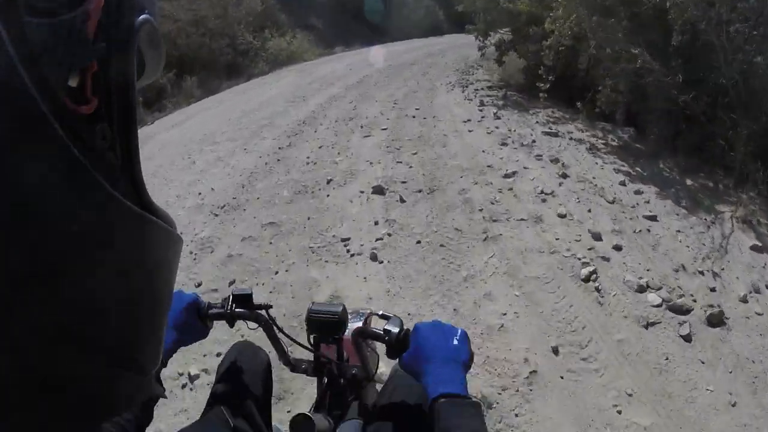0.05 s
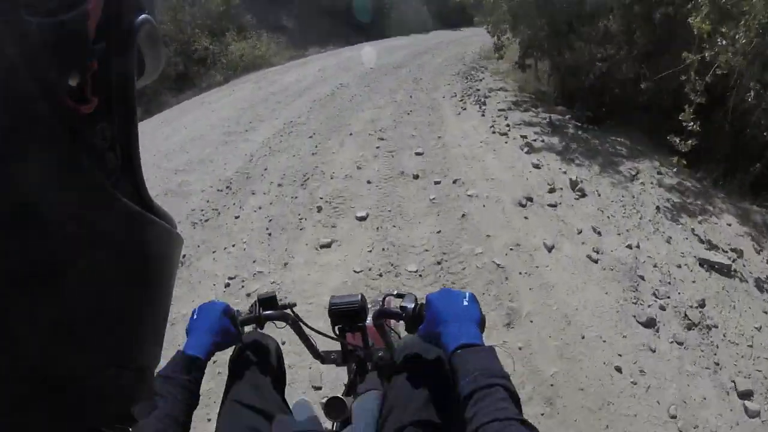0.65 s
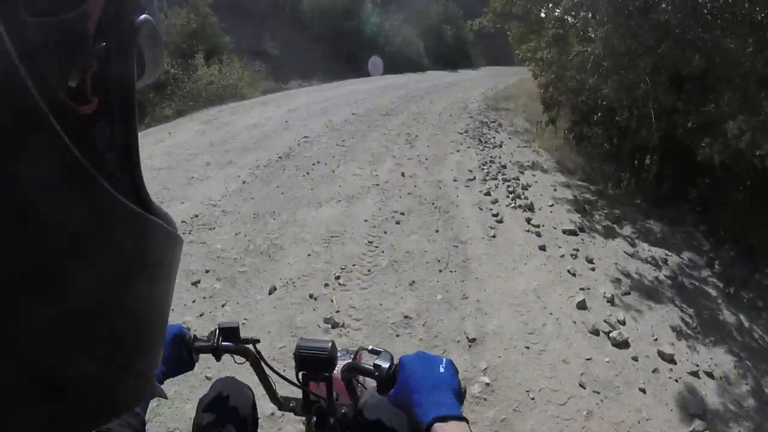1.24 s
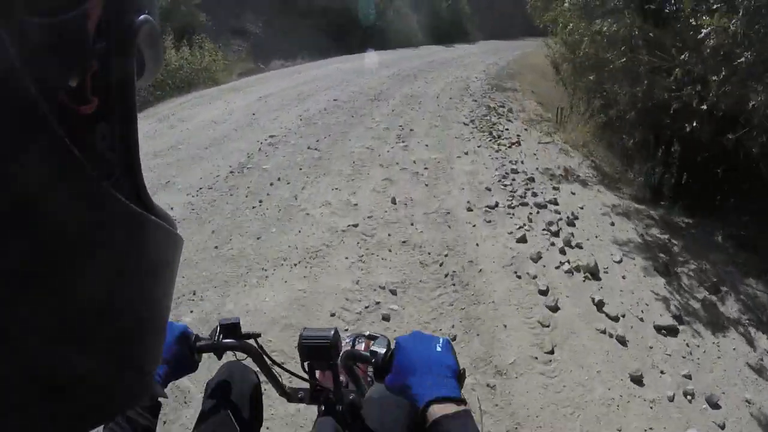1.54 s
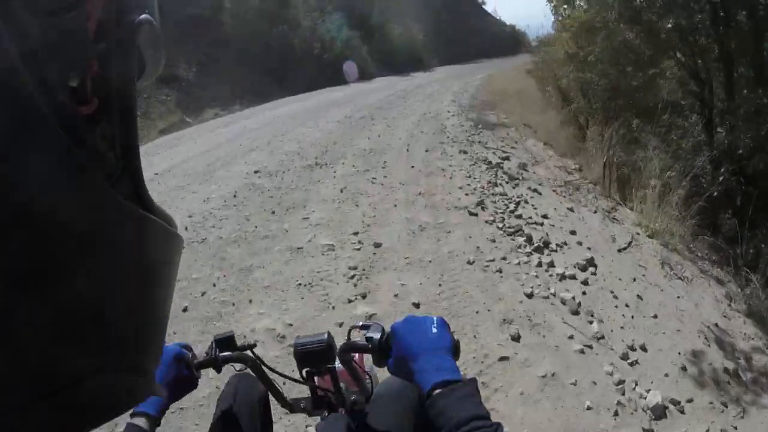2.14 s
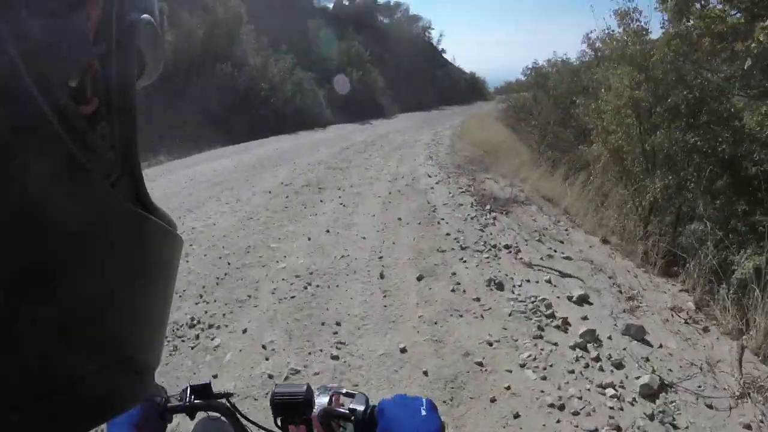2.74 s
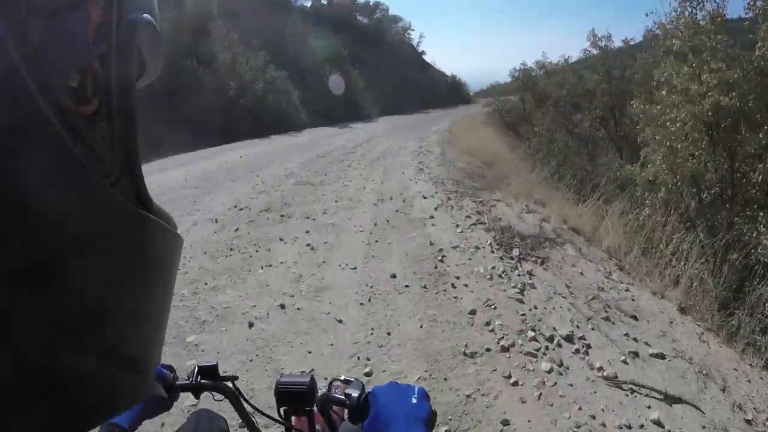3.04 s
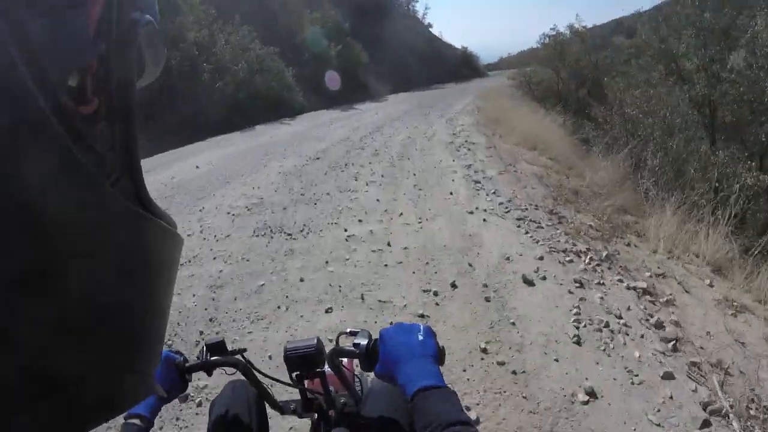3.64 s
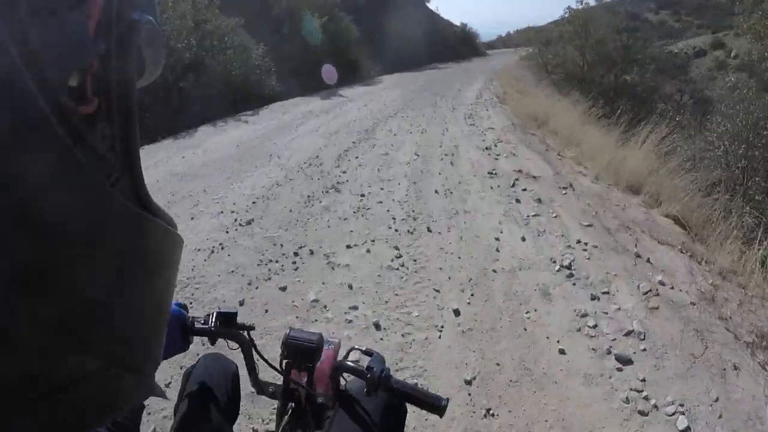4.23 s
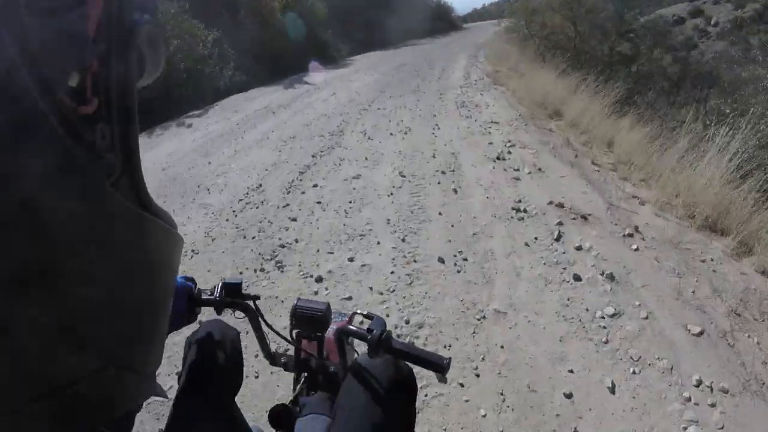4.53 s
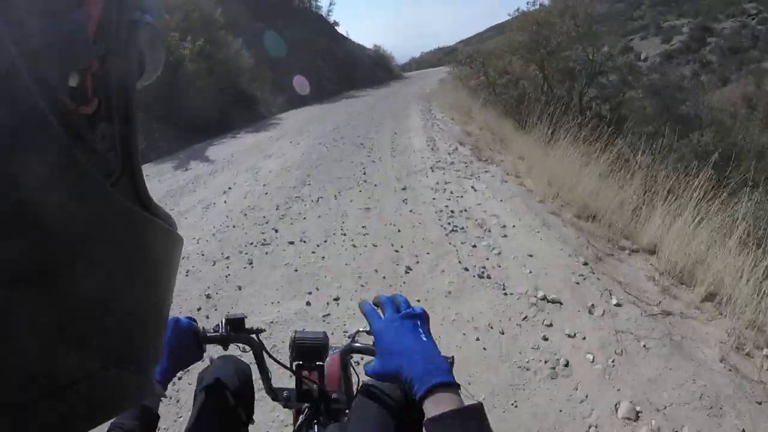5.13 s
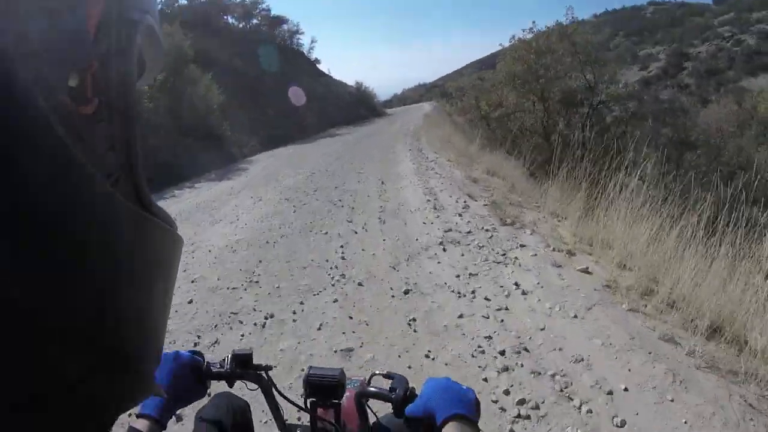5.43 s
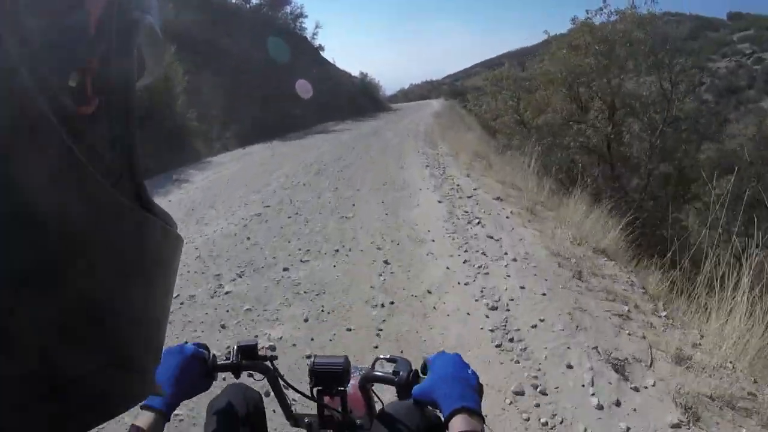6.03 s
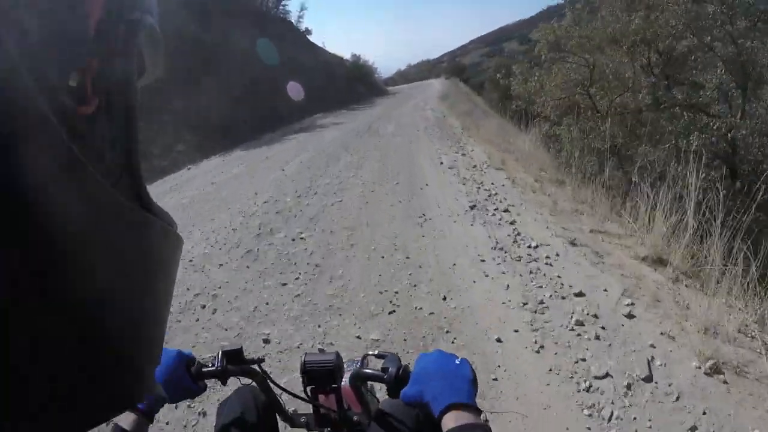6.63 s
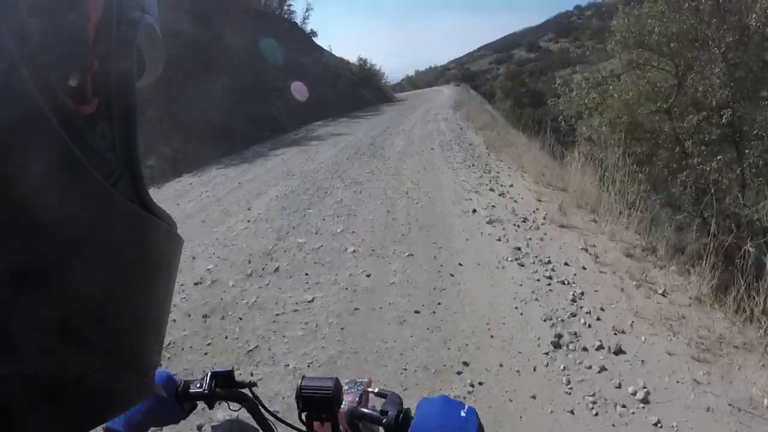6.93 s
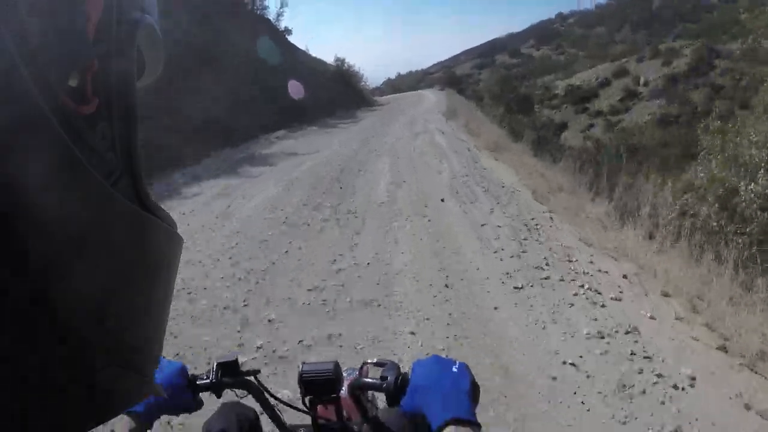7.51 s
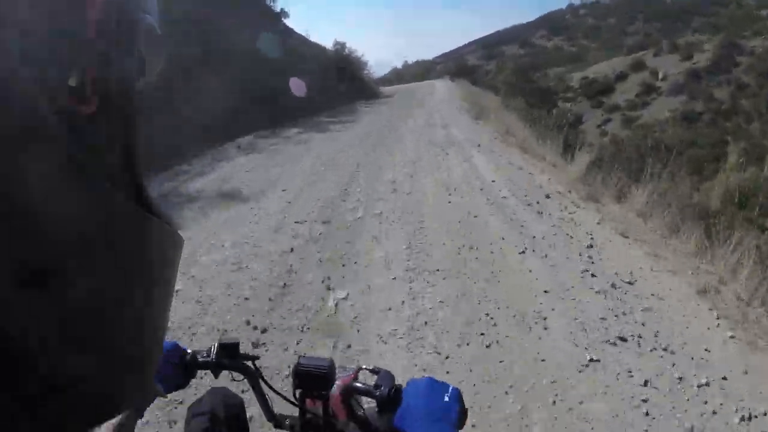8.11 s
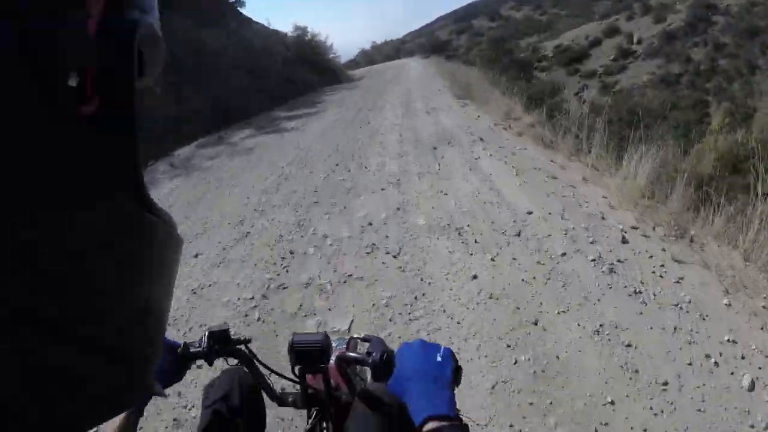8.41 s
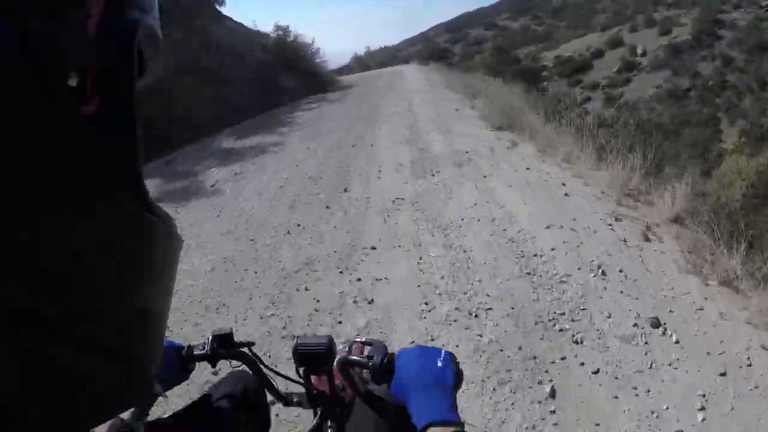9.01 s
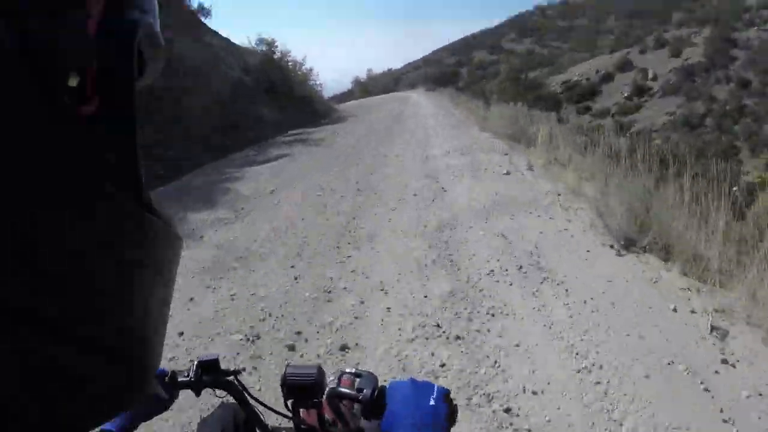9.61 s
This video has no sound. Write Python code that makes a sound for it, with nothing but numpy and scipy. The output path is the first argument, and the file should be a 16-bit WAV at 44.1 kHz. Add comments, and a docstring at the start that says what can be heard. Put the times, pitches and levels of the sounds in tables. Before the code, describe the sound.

Heard close from the rider's helmet in open air, tyres crunch over loose gravel as a minibike rolls without its engine. It opens with a short wavering brake hum, a sharp stone strike and deep thumps. Irregular knocks and metal clanks follow, with a buzzing frame, hissing sand and low air rumble. After a smoother stretch, the jolts and clatter return.

```python
"""A minibike jolts down a gravel road, engine off, heard from the rider's helmet.
Bumps rock the camera with a deep thump, a loose part knocks on its stop, steel parts clank.
The tyres roar, crunch and fling stones; the frame buzzes and sand hisses on thin steel.
Air and road rumble underneath. At first a dragging brake hums."""
import sys
import numpy as np
from scipy import signal
from scipy.fft import rfft, irfft, next_fast_len
from scipy.io import wavfile
from scipy.ndimage import map_coordinates

SR = 44100
rng = np.random.default_rng(int(sys.argv[2]) if len(sys.argv) > 2 else 0)


def put_to_file(sound):
    """Save the sound as 16-bit audio at rate SR, in the file named by the first command-line argument."""
    columns = np.atleast_2d(sound).T  # one column per channel
    safe = np.clip(columns, -1, 1)
    whole_steps = np.round(safe * 32767)
    wavfile.write(sys.argv[1], SR, whole_steps.astype(np.int16))


N = 430416
TIME_S = np.arange(N) / SR
HIT_S = np.arange(SR // 3) / SR  # time within one hit

# Timelines; levels are relative within each column.
# road shaking the bike: time_s, level_db
ROAD_SHAKE = [(0.0, -40.5), (0.35, -52.5), (0.58, -41.5), (0.89, -45.5), (1.68, -43), (1.96, -52),
              (2.2, -47), (2.88, -47), (3.04, -54), (3.23, -56.5), (3.97, -51.5), (4.27, -42.5),
              (5.06, -48.5), (5.43, -47), (5.63, -53.5), (6.03, -62), (6.5, -55.5), (6.68, -48.5),
              (6.95, -57), (7.26, -61), (7.75, -54), (7.88, -47.5), (8.78, -49), (9.05, -43.5),
              (9.76, -47.5)]
# air and road rumble: time_s, level_db
RUMBLE_CURVE = [(0.0, -44.5), (0.46, -51), (1.14, -37.5), (2.28, -48.5), (2.77, -44), (3.2, -47),
                (3.5, -57), (3.72, -52), (4.0, -54), (4.35, -47), (5.5, -44), (5.73, -57), (6.2, -58.5),
                (6.75, -51.5), (7.2, -61), (7.5, -55.5), (7.72, -56), (7.95, -44), (8.4, -44.5),
                (8.87, -46.5), (9.16, -37.5), (9.76, -43.5)]
# brake pad drags: peak_s, swell_s, level_db
BRAKE_RUBS = [(0.005, 0.12, -46), (0.495, 0.89, -37), (1.0, 0.61, -48), (1.23, 0.47, -50.5),
              (1.38, 0.16, -51), (1.75, 0.76, -51.5), (1.92, .3, -54), (2.15, .4, -54.5)]
# pebbles hit the mudguard: start_s, level_db
PEBBLE_HITS = [(0.130, -42), (0.986, -49), (2.109, -49), (2.197, -52), (2.225, -49), (2.333, -47.5),
               (2.413, -56), (3.146, -65), (3.595, -52), (3.875, -55), (4.926, -48), (5.683, -54),
               (5.722, -56.5), (5.797, -58), (6.037, -61), (6.151, -56), (6.180, -56), (6.222, -51.5),
               (6.251, -58), (6.272, -61), (6.281, -60), (6.319, -60), (6.347, -58), (6.407, -53.5),
               (6.425, -51), (6.440, -53), (6.627, -50), (6.814, -55), (7.032, -57), (7.267, -54),
               (7.462, -54), (7.688, -57), (9.041, -48), (9.084, -49)]
# small steel fitting lands: start_s, level_db
FITTING_HITS = [(0.801, -54), (0.945, -55), (1.055, -55), (1.076, -49), (1.128, -58), (1.292, -59),
                (1.312, -58), (1.522, -53), (1.550, -59), (1.577, -55), (2.402, -64), (2.858, -54),
                (2.880, -58), (4.385, -55), (4.783, -58), (4.888, -53), (9.072, -53)]
# tyre squeezes out a heap of stones: start_s, level_db
STONE_HEAPS = [(0.896, -28.5), (1.945, -39.5), (2.107, -36.5), (2.254, -37.5), (2.304, -36), (2.334, -38.5),
               (2.417, -59), (3.046, -40), (3.257, -39), (3.405, -39.5), (3.545, -50), (5.964, -56),
               (7.114, -42), (7.935, -36.5), (8.057, -36), (8.171, -39), (8.804, -41.5), (8.9227, -32)]
# stones hit the frame: start_s, level_db
STONE_HITS = [(0.801, -32), (0.9071, -1.5), (1.0758, -22), (1.181, -33), (9.022, -24), (9.301, -27)]
# chassis bottoms out: start_s, level_db
CHASSIS_HITS = [(1.585, -13)]
# steel parts clash: start_s, level_db, splinter_db, bracket_db
STEEL_HITS = [(0.3185, -39.5, -76, -60), (0.5817, -37.5, -57, -58), (0.6845, -29, -59, -39),
              (0.8557, -36.5, -57, -54), (1.0966, -37, -58, -53), (1.3414, -39, -56.5, -51),
              (1.4735, -35, -69, -52), (1.51, -38.5, -76, -55), (1.6170, -36, -59, -50),
              (2.1618, -41, -73, -56), (2.6497, -44.5, -61.5, -54), (2.701, -43, -76, -62),
              (2.7981, -32, -64, -50), (2.91, -35, -57, -55), (4.09, -43, -60, -56),
              (4.2374, -26, -54, -36), (4.2621, -21.5, -46, -24.5), (4.4148, -38.5, -69, -58),
              (4.5918, -30, -57, -55), (4.6457, -41, -74, -58), (5.121, -43.5, -66, -59),
              (5.1782, -33.5, -61, -48), (6.559, -28, -57, -51), (6.6674, -43, -78, -60),
              (6.7415, -46.5, -80, -66), (7.8694, -40, -63, -55), (8.821, -39.5, -61, -60),
              (8.9519, -28.5, -59, -37), (9.423, -41.5, -78, -52), (9.6759, -39, -67, -44)]
# loose part hits its stop: start_s, clack_db, pitch_hz, hollow_db
PART_HITS = [(0.6689, -29.5, 1820, -47), (1.475, -31.5, 1810, -45), (1.7265, -37, 1980, -38),
             (2.0632, -38, 1850, -41.5), (2.2274, -42, 1960, -44), (2.381, -45, 1820.0, -55),
             (2.609, -39.5, 1750.0, -56), (2.6609, -44, 1870, -42.5), (2.7791, -38.5, 1670, -57),
             (2.805, -27.5, 1803, -36.5), (2.9477, -42, 1770, -39), (3.0111, -34.0, 1745, -46),
             (3.072, -47, 1850, -42), (3.2, -64, 1830, -44), (3.222, -51, 1880, -40.5),
             (3.3992, -37, 1790, -45), (3.5528, -50, 1900, -42.5), (3.627, -49, 1830, -42.5),
             (3.7189, -30.5, 1900, -41), (3.834, -48, 1830, -42.5), (4.0178, -34, 1820, -38),
             (4.1385, -30.5, 1860, -34.5), (4.2253, -25, 1914, -34.5), (4.3385, -30.5, 1870, -39),
             (4.37, -18.5, 1810, -28), (4.5216, -31.0, 1834, -38), (4.7067, -22, 1825, -49),
             (4.814, -19.5, 1838, -27), (4.9656, -26.5, 1857, -35), (5.1582, -26, 1720, -33),
             (5.2909, -30, 1870, -33), (5.4375, -31.5, 1855, -35.5), (5.4989, -40, 1830, -45),
             (5.5732, -26.0, 1810, -35), (5.7838, -46.0, 1820, -57), (5.934, -55, 1870, -44.5),
             (6.3056, -52, 1700, -43.5), (6.536, -48, 1780, -51), (6.582, -44, 1780, -38.5),
             (6.758, -38, 1890, -43.5), (6.9217, -36.5, 1930, -45.5), (7.0713, -42.5, 1675, -40),
             (7.4066, -40.5, 1890, -44), (7.7263, -33, 1890, -35), (7.8181, -36, 1883, -44),
             (7.9084, -30.5, 1796, -35), (8.0641, -40, 1840, -46), (8.163, -43, 1850, -44),
             (8.2771, -33, 1787, -35), (8.3724, -43, 1930, -37.5), (8.4427, -45, 1970, -40),
             (8.5974, -42, 1787, -37.5), (8.7061, -29, 1790, -37.5), (8.8438, -32.5, 1757, -52),
             (8.9625, -24, 1817, -33.5), (9.0094, -26, 1865, -35.5), (9.0563, -19.5, 1785, -37),
             (9.2135, -29, 1850, -34), (9.3487, -24, 1820, -38), (9.4509, -30.0, 1822, -33),
             (9.5487, -21.5, 1853, -41)]
# road bumps, sharp edges thump: start_s, sway_db, thump_db
ROAD_BUMPS = [(0.071, -21.5, -70), (0.205, -23.5, -68), (0.67, -18.5, -35), (0.906, -2, -16),
              (0.996, -13, -57), (1.132, -4.5, -27.5), (1.377, -7, -33), (1.482, -2, -19),
              (1.751, -17.5, -69), (2.021, -18, -38), (2.476, -13.5, -55), (2.579, -12.5, -48),
              (2.812, -6, -26), (4.183, -21, -39), (4.337, -9.5, -33), (4.472, -12.5, -31.5),
              (4.675, -15.5, -34.5), (4.786, -13, -25), (4.931, -17.5, -51), (5.127, -12, -37.5),
              (5.391, -22, -38), (5.519, -24, -56), (6.674, -28, -58), (7.914, -22, -34),
              (8.372, -16.5, -37), (8.698, -25.5, -53), (9.013, -8, -22.5), (9.315, -17, -70),
              (9.415, -11.5, -30), (9.511, -13, -29)]

# modes of struck bodies: pitch_hz, level_db, t60_s
MUDGUARD_MODES = [(3260, 0, .034), (3640, -2, .026), (5400, -17, .015), (6500, -13, .016),
                  (7250, -14, .016), (8500, -8.5, .024)]
FITTING_MODES = [(4740, 3, 0.023), (5200, -2, 0.073)]
STONE_MODES = [(540, -11, 0.01), (995, -19, 0.011), (1520, -3.5, 0.015), (1790, -2.5, 0.014),
               (2130, -0.5, 0.014), (2930, -2.5, 0.032), (3485, -5.5, 0.0056), (5060, -17, 0.0064),
               (6500, -34, .005), (7930, -29, .006)]
CHASSIS_MODES = [(212.5, -0.5, 0.21), (326, -7.5, 0.11), (446, 1, 0.0085), (610, -7, 0.042),
                 (680, -2, 0.055), (984, -6.5, 0.031), (1380, -0.5, 0.0065)]
STEEL_MODES = [(2100, -10, .08), (2995, -13, .07), (3305, 0, .14), (3480, -6, .07), (3658, -3, .1),
               (6120, -19, .05), (8550, -17, .05)]
TUBE_MODES = [(681, -11, 0.1), (1248, -10, 0.16), (1351, -5.5, 0.14), (1408, -7.5, 0.2), (1897, -8.5, 0.15)]
BRACKET_MODES = [(4240, 0, .11), (4390, -9, .07), (4546, -13, .06)]
PART_MODES = [(404, -19, 0.063), (973, -14, 0.034), (1308, -9, 0.023), (1696, 0, 0.0048),
              (1840, 1.5, 0.023), (2120, -20.5, 0.15), (2360, -5.5, 0.012), (2760, -6.5, 0.0037),
              (3080, -14.5, 0.024), (4900, -28.5, 0.0093)]
HOLLOW_MODES = [(715.6, 0, 0.063), (655, -8.5, 0.0093), (1374, -8.5, 0.043)]

# resonances of thin steel and frame: centre_hz, width_hz, gain_db
SHEET_PEAKS = [(3215, 190, 10), (3630, 240, -10), (5600, 210, -22), (6170, 100, 0.5), (7100, 69, -6),
               (8140, 67, -44)]
FRAME_PEAKS = [(708, 51, 7), (1363, 42, 10), (1386, 133, 2.5), (1938, 44, 9), (2080, 15, 10.5),
               (2377, 14, 6.5), (3420, 45, -19), (3634, 82, 8), (4326, 36, 3)]

# spectra of rolling and contact noise: freq_hz, density_db
RUMBLE_SPECTRUM = [(12, -4), (24, -2.5), (35, 2), (44, -23.5), (55, -17), (85, -43), (200, -40.5),
                   (400, -108)]
FIZZ_SPECTRUM = [(3000, -20.5), (4700, 8), (6500, 2.5), (8500, 3), (9800, -10.5), (12500, -0.5), (15000, 2)]
GRIT_SPECTRUM = [(1500, -20), (2700, -6), (3300, 8), (3700, 6), (4600, -12), (6300, -6), (7200, -12),
                 (8500, -7), (9800, -25), (15000, -42)]
TYRE_SPECTRUM = [(40, -29), (75, -6.5), (110, 3.5), (160, -1), (220, 0), (380, 1.5), (500, -2.5),
                 (650, 1.5), (850, -6.5), (1200, -8.5), (2000, -13.5), (3000, -45.5), (6000, -52)]
GRAVEL_SPECTRUM = [(300, -43), (1000, -0.5), (1600, 1), (2600, -1.5), (3400, 4.5), (4100, -2.5),
                   (4700, -16), (5600, -25), (6300, -10), (7400, -50), (8600, -23), (10000, -42),
                   (15000, -62)]
SCUFF_SPECTRUM = [(100, -11), (450, -10.5), (1100, -10), (1750, -9.5), (2900, -7), (3800, -15), (6000, -53),
                  (12000, -58)]
CLASH_SPECTRUM = [(300, -13), (1000, -8.5), (1400, -13), (2550, 1), (3400, 4), (4300, -4.5), (4800, -11.5),
                  (6300, -10.5), (7400, -19), (8600, -14), (10300, -44), (15000, -56)]
SNAP_SPECTRUM = [(2000, -20), (3600, 0), (5300, -1), (7000, -9), (8600, -8), (10000, -18), (15000, -22)]
SPLINTER_SPECTRUM = [(2000, -30), (5000, -3), (6400, 0), (7400, -3), (8800, 2), (10200, -7), (15000, -8)]

# treble loss of the camera housing: freq_hz, gain_db
HOUSING_RESPONSE = [(9000, 0), (11000, -3), (13000, -8), (15000, -14)]


def amp(db):
    """Decibels to gain."""
    return 10 ** (np.asarray(db) / 20)


def unit(x):
    """Scale to rms 1."""
    return x / np.sqrt(np.mean(x ** 2) + 1e-20)


def burst(x):
    """Scale to the energy of 10 ms at rms 1."""
    return x / np.sqrt(np.sum(x ** 2) / (SR / 100) + 1e-20)


def wobble(rate_hz, size=N):
    """Smooth random curve, rate_hz knots a second."""
    knots = rng.standard_normal(int(size * rate_hz / SR) + 4)
    return map_coordinates(knots, [np.arange(size) * rate_hz / SR])


def filtered(x, response):
    """Apply a complex frequency response."""
    size = 2 * next_fast_len(len(x) // 2 + 4096)
    return irfft(rfft(x, size) * response(np.fft.rfftfreq(size, 1 / SR)), size)[:len(x)]


def coloured(x, spectrum):
    """Minimum-phase filter through (freq_hz, gain_db) points."""
    def response(hz):
        freq_hz, gain_db = np.transpose(spectrum)
        gain = amp(np.interp(np.log(hz + 1), np.log(freq_hz), gain_db))
        cepstrum = irfft(np.log(gain))
        half = len(cepstrum) // 2
        return np.exp(rfft(np.r_[cepstrum[0], 2 * cepstrum[1:half], np.zeros(half)]))
    return filtered(x, response)


def resonant(x, peaks):
    """Parallel band-pass resonators."""
    def response(hz):
        return sum(amp(db) * 1j * hz * width_hz / (centre_hz ** 2 - hz ** 2 + 1j * hz * width_hz)
                   for centre_hz, width_hz, db in peaks)
    return filtered(x, response)


def add(track, start_s, x):
    """Mix x into the track."""
    start = max(round(start_s * SR), 0)
    track[start:start + len(x)] += x[:max(N - start, 0)]


def fade(rise_s, hold_s, t60_s):
    """Hit envelope: rise, contact, decay."""
    return (1 - np.exp(-HIT_S / rise_s)) * amp(-60 * np.maximum(HIT_S - hold_s, 0) / t60_s)


def ring(modes, rise_s, hold_s, spread_db, rough, sag=0):
    """Struck modes; loose joints make the phases wander, pitch sags as contact eases."""
    out = np.zeros(len(HIT_S))
    clock_s = HIT_S + sag * hold_s * (1 - np.exp(-HIT_S / hold_s))
    for hz, db, t60_s in modes:
        drift = rough * np.cumsum(wobble(hz / 2, size=len(HIT_S))) * hz / SR
        phase = 2 * np.pi * (hz * clock_s + rng.random()) + drift
        out += amp(db + spread_db * rng.standard_normal()) * fade(rise_s, hold_s, t60_s) * np.sin(phase)
    return burst(out)


def scrape(spectrum, rise_s, hold_s, t60_s):
    """Noise of one rough contact."""
    return burst(coloured(fade(rise_s, hold_s, t60_s) * rng.standard_normal(len(HIT_S)), spectrum))


def grains(rate_hz, spread_db, t60_s):
    """Random short noisy contacts of very unequal size."""
    size = amp(spread_db * np.minimum(rng.exponential(size=N), 2.8))
    impacts = (rng.random(N) < rate_hz / SR) * size ** 2
    power = signal.fftconvolve(impacts, amp(-120 * HIT_S / t60_s))[:N]
    return unit(np.sqrt(np.abs(power)) * rng.standard_normal(N))


def pings(rate_hz, pitch_hz, scatter, cycles, spread_db):
    """Stones click together: damped sines of random pitch, life and size."""
    when, pitch, life, size = rng.random((int(rate_hz * N / SR), 4)).T
    hz = np.clip(pitch_hz * np.exp(scatter * (2 * pitch - 1)), 200, SR / 3)[:, None]
    t = HIT_S[:SR // 200]
    age = t * hz / (cycles * np.exp(2 * life - 1))[:, None]
    strength = amp(-spread_db * np.log(size + 1 / 80))[:, None]
    waves = strength * np.sqrt(hz) * np.exp(-age) * np.sin(2 * np.pi * hz * t) * (1 - t / t[-1])
    samples = (when * N).astype(int)[:, None] + np.arange(len(t))
    return unit(np.bincount(samples.ravel(), waves.ravel())[:N])


def shake_db(time_s):
    """Road shaking relative to its average."""
    knots_s, db = np.transpose(ROAD_SHAKE)
    return np.interp(time_s, knots_s, db - db.mean())


def rumble():
    """Low noise of air and road."""
    level_db = np.interp(TIME_S, *np.transpose(RUMBLE_CURVE))
    return amp(level_db + 8.5) * unit(coloured(rng.standard_normal(N), RUMBLE_SPECTRUM))


def sand_spray(road_db, sheet_db=-63.5, fizz_db=-67, grit_db=-60.5):
    """Sand hisses off the tyres and rings thin steel; bits of grit tick."""
    puffs = grains(rate_hz=110, spread_db=2.6, t60_s=.04)
    ticks = pings(rate_hz=900, pitch_hz=6500, scatter=.45, cycles=4, spread_db=2)
    sand = .55 * puffs + .4 * ticks + .75 * rng.standard_normal(N)
    sheet = amp(sheet_db) * unit(resonant(sand, SHEET_PEAKS))
    fizz = amp(fizz_db) * unit(coloured(sand, FIZZ_SPECTRUM))
    bits = grains(rate_hz=36, spread_db=3, t60_s=.045) * amp(2 * wobble(6))
    grit = unit(coloured(bits, GRIT_SPECTRUM))
    return amp(.32 * road_db) * (sheet + fizz) + amp(grit_db + .75 * road_db) * grit


def fitting_chinks():
    """A small loose steel fitting rings as it lands."""
    out = np.zeros(N)
    for start_s, db in FITTING_HITS:
        chink = ring(FITTING_MODES, rise_s=.001, hold_s=.004, spread_db=3, rough=.13)
        add(out, start_s, amp(db) * chink)
    return out


def pebble_ticks():
    """Flicked pebbles tick on the mudguard."""
    out = np.zeros(N)
    for start_s, db in PEBBLE_HITS:
        tick = ring(MUDGUARD_MODES, rise_s=.0005, hold_s=.002, spread_db=2.5, rough=.2)
        snap = scrape(SPLINTER_SPECTRUM, rise_s=.0003, hold_s=.002, t60_s=.02)
        add(out, start_s, amp(db - 1) * (tick + amp(-23) * snap))
    return out


def brake_hum(hum_hz=321, rub_db=-17, release_t60_s=.3):
    """The dragging pad swells on one wavering note over its rub, then lets go."""
    grip = sum(amp(db - 60 * np.maximum((peak_s - TIME_S) / swell_s, (TIME_S - peak_s) / release_t60_s))
               for peak_s, swell_s, db in BRAKE_RUBS)
    phase = 2 * np.pi * np.cumsum(hum_hz * (1 + .013 * wobble(40))) / SR
    note = unit(np.sin(phase) + amp(-19) * np.sin(2 * phase))
    rub = unit(coloured(rng.standard_normal(N), SCUFF_SPECTRUM))
    return grip * amp(1.2 * wobble(30)) * (note + amp(rub_db) * rub)


def tyre_roar(road_db, level_db=-51):
    """Rolling tyres roar, louder on rough road."""
    tread = rng.standard_normal(N) * amp(2.77 * wobble(35))
    return amp(level_db + .35 * road_db) * unit(coloured(tread, TYRE_SPECTRUM))


def frame_buzz(road_db, patch_db, sand, level_db=-52, cutoff_hz=5300):
    """Jolts stir the frame's resonances; the buzz stays out of the high treble."""
    jolts = grains(rate_hz=54, spread_db=6, t60_s=.053) + amp(-6.5) * sand
    buzz = filtered(resonant(jolts, FRAME_PEAKS), lambda hz: 1 / (1 + (hz / cutoff_hz) ** 6))
    return amp(level_db + .89 * road_db + patch_db) * unit(buzz)


def gravel_crunch(road_db, patch_db, sand, level_db=-55.5, skid_db=-49):
    """Sand, stones and grit crunch under the tyres, more as a bump presses them in."""
    skid = np.zeros(N)
    for start_s, db, _ in ROAD_BUMPS:
        add(skid, start_s - .03, amp(db + skid_db) * fade(rise_s=.03, hold_s=.024, t60_s=.062))
    clicks = pings(rate_hz=2000, pitch_hz=4800, scatter=.7, cycles=4, spread_db=1.8)
    clicks *= amp(2 * wobble(20))
    grit = grains(rate_hz=55, spread_db=4, t60_s=.045)
    gravel = sand * amp(2 * wobble(22)) + amp(-2) * unit(clicks) + amp(-1) * grit
    return (amp(level_db + .9 * road_db + patch_db) + skid) * unit(coloured(gravel, GRAVEL_SPECTRUM))


def heap_crunches():
    """Heaped stones grind together under a tyre in short bursts."""
    out = np.zeros(N)
    for start_s, db in STONE_HEAPS:
        grind = scrape(GRAVEL_SPECTRUM, rise_s=.0035, hold_s=.01, t60_s=.17)
        splinters = scrape(CLASH_SPECTRUM, rise_s=.0018, hold_s=.0034, t60_s=.075)
        add(out, start_s - .002, amp(db - 7) * (grind + amp(-1) * splinters))
    return out


def stone_cracks():
    """Flung stones crack against the frame."""
    out = np.zeros(N)
    for start_s, db in STONE_HITS:
        chip = ring(STONE_MODES, rise_s=.0002, hold_s=.0025, spread_db=1, rough=.3)
        crack = scrape(CLASH_SPECTRUM, rise_s=.0002, hold_s=.0022, t60_s=.009)
        snap = scrape(SNAP_SPECTRUM, rise_s=.0001, hold_s=.0015, t60_s=.008)
        add(out, start_s, amp(db - 19) * (chip + amp(-3) * crack + amp(-10) * snap))
    return out


def chassis_thud():
    """The chassis bottoms out: low modes and a scuff."""
    out = np.zeros(N)
    for start_s, db in CHASSIS_HITS:
        thud = ring(CHASSIS_MODES, rise_s=.002, hold_s=.005, spread_db=.5, rough=.2)
        scuff = scrape(SCUFF_SPECTRUM, rise_s=.0009, hold_s=.0055, t60_s=.023)
        add(out, start_s, amp(db - 9.5) * (thud + amp(-15.5) * scuff))
    return out


def stray_clanks(count=8, level_db=-48, spread_db=3):
    """Rows of faint random steel hits, stronger on rough road."""
    when, size = rng.random((count, 2)).T
    starts_s = (np.arange(count) + when) / count * N / SR
    levels_db = level_db + shake_db(starts_s) + spread_db * (2 * size - 1)
    return [(start_s, db, db - 30, db - 15) for start_s, db in zip(starts_s, levels_db)]


def steel_clanks(hard_db=-21, hard_contact_s=.011):
    """Steel parts grind and chatter, longer when hit hard; a bracket and the frame tubes ring."""
    out = np.zeros(N)
    for start_s, db, splinter_db, bracket_db in STEEL_HITS + stray_clanks():
        contact_s = hard_contact_s * amp(.5 * (db - hard_db))
        steel = ring(STEEL_MODES, rise_s=.001, hold_s=contact_s, spread_db=2, rough=.11)
        clash = scrape(CLASH_SPECTRUM, rise_s=.0003, hold_s=contact_s, t60_s=.075)
        chatter = scrape(GRAVEL_SPECTRUM, rise_s=.0032, hold_s=.0016, t60_s=.15)
        tube = ring(TUBE_MODES, rise_s=.003, hold_s=.008, spread_db=2.5, rough=.18)
        bracket = ring(BRACKET_MODES, rise_s=.001, hold_s=contact_s, spread_db=1, rough=.085)
        snap = scrape(SPLINTER_SPECTRUM, rise_s=.0002, hold_s=contact_s / 3, t60_s=.028)
        tail = scrape(SPLINTER_SPECTRUM, rise_s=.002, hold_s=contact_s, t60_s=.14)
        metal = amp(db - 3) * (clash + amp(-1) * steel + amp(-2.5) * chatter)
        ringing = amp(.79 * db - 10) * tube + amp(bracket_db) * bracket
        splinter = amp(splinter_db + 4.5) * (snap + amp(-4) * tail)
        add(out, start_s, metal + ringing + splinter)
    return out


def part_knocks(hard_db=-15.5, hard_contact_s=.0045, dull_above_hz=1800):
    """A loose part clacks on its stop, duller and shorter when soft; a brief hollow note follows."""
    out = np.zeros(N)
    main_hz = max(PART_MODES, key=lambda mode: mode[1])[0]
    for start_s, db, pitch_hz, hollow_db in PART_HITS:
        force_db = db - hard_db
        tilt_db_per_octave = .36 * force_db + 1.8 * rng.standard_normal()
        tilt_db = lambda hz: tilt_db_per_octave * max(np.log2(hz / dull_above_hz), 0)
        contact_s = hard_contact_s * amp(.18 * force_db + 2.8 * rng.standard_normal())
        modes = [(hz * pitch_hz / main_hz, level + tilt_db(hz), t60) for hz, level, t60 in PART_MODES]
        clack = ring(modes, rise_s=.0013, hold_s=contact_s, spread_db=2.5, rough=.15, sag=.08)
        spectrum = [(hz, level + tilt_db(hz)) for hz, level in SCUFF_SPECTRUM]
        scuff = scrape(spectrum, rise_s=.00067, hold_s=.01, t60_s=.03)
        detune = 1 + .018 * rng.standard_normal()
        detuned = [(hz * detune, level, t60) for hz, level, t60 in HOLLOW_MODES]
        hollow = ring(detuned, rise_s=.007, hold_s=rng.uniform(.008, .018),
                      spread_db=2.5, rough=.24, sag=.015)
        knock = amp(db - 2.5) * (clack + amp(-11.5) * scuff) + amp(hollow_db - .8) * hollow
        add(out, start_s - .001, knock)
    return out


def bump_thumps(mount_hz=34, body_cutoff_hz=47):
    """Bumps thump and rock the camera on its springy mount; the rider's body soaks up fast sway."""
    swell = np.sin(np.pi / 2 * np.minimum(HIT_S / .029, 1)) ** 2
    decay = amp(-60 * np.maximum(HIT_S - .036, 0) / .33)
    rocking = -swell * decay * np.sin(2 * np.pi * mount_hz * HIT_S)
    thump_modes = [(101, -3, .17), (128, 0, .13), (215, -9, .15)]
    sway, thumps = np.zeros((2, N))
    for start_s, sway_db, thump_db in ROAD_BUMPS:
        add(sway, start_s - .5 / mount_hz, amp(sway_db - 7) * rocking)  # dip leads by half a swing
        thump = ring(thump_modes, rise_s=.006, hold_s=.008, spread_db=1.5, rough=.25)
        add(thumps, start_s, amp(thump_db - 7) * thump)
    return filtered(sway, lambda hz: 1 / (1 + (hz / body_cutoff_hz) ** 8)) + thumps


def scene():
    """Mono mix in open air; all sources ride with the bike."""
    road_db = shake_db(TIME_S)
    patch_db = 1.5 * wobble(7)  # gravel lies in patches
    sand = rng.standard_normal(N)
    background = rumble() + sand_spray(road_db) + fitting_chinks() + pebble_ticks() + brake_hum()
    rolling = tyre_roar(road_db) + frame_buzz(road_db, patch_db, sand)
    stones = gravel_crunch(road_db, patch_db, sand) + heap_crunches() + stone_cracks()
    jolts = chassis_thud() + steel_clanks() + part_knocks() + bump_thumps()
    return (background + rolling + stones + jolts)[None]


def record(dry):
    """Faint microphone hiss, treble dulled by the housing, hard band limit."""
    hiss_db, limit_hz = -74, 15240
    heard = dry[0] + amp(hiss_db) * rng.standard_normal(N)
    housing = lambda hz: amp(np.interp(hz, *np.transpose(HOUSING_RESPONSE))) * (hz < limit_hz)
    return filtered(heard, housing)[None]


dry = scene()
out = record(dry)
put_to_file(out)
```